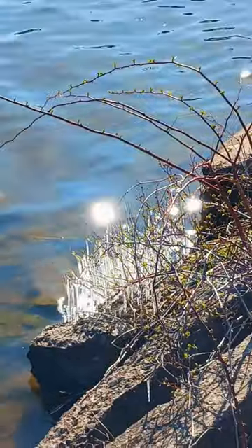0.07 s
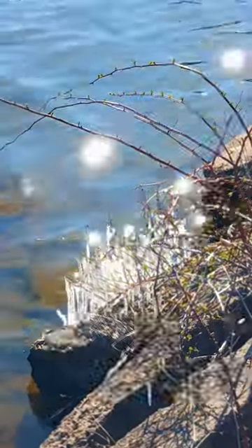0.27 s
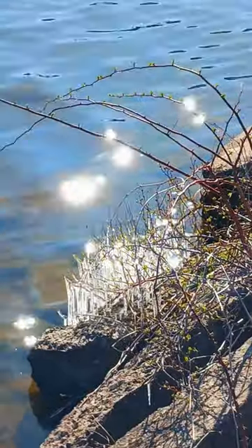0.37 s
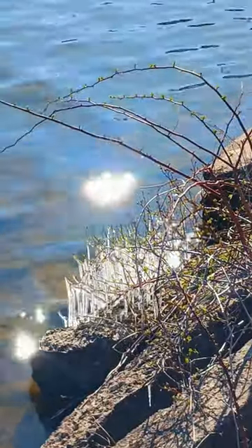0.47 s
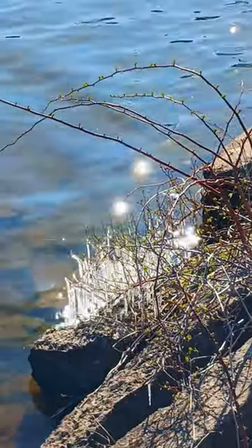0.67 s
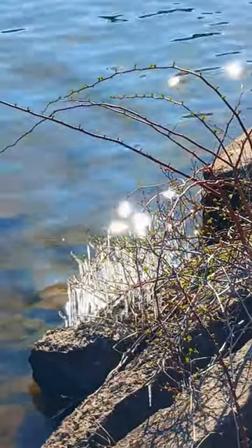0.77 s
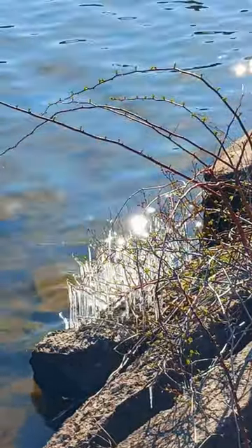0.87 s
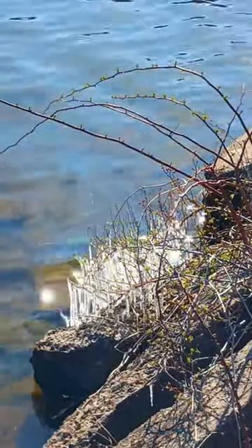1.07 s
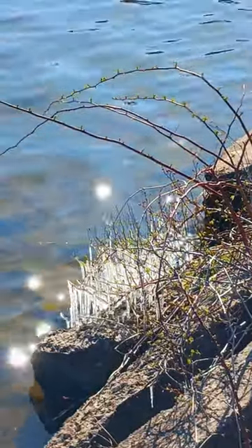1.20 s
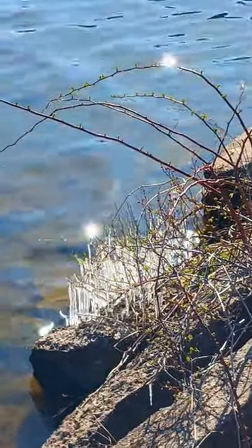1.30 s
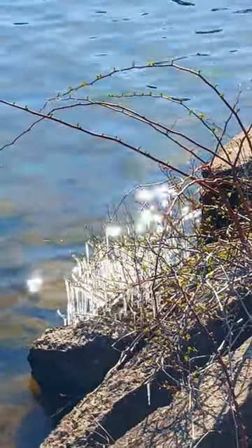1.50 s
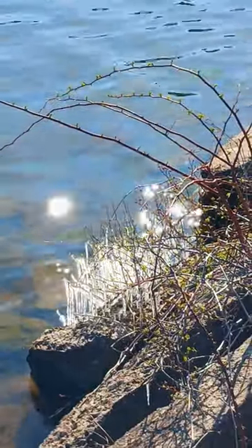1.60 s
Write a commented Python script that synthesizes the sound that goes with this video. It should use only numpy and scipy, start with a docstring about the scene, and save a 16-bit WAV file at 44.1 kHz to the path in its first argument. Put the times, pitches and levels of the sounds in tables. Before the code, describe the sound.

Wind buffets the microphone in low thumps beside a lakeshore, with faint water ticks and drips

```python
"""A rocky, icy lakeshore in wind, heard at a microphone with a left and a right port.
A gust buffets mostly the right port, with low thumps and ragged rasps, then sinks to light puffs: shaped noise.
Ripples lap the rocks: fizz built from tiny ringing pops, ticks from noise snaps, drips from short tones.
Behind them lie a far wash of noise and a low drone of two tones, probably a distant engine."""
import sys
import numpy as np
from scipy import signal
from scipy.fft import rfft, irfft
from scipy.io import wavfile
from scipy.ndimage import uniform_filter1d

SR = 44100
rng = np.random.default_rng(int(sys.argv[2]) if len(sys.argv) > 2 else 0)


def inscribe(sig):
    """Save sig as 16-bit PCM at rate SR to the path in sys.argv[1].

    A 1-D sig is mono; a 2-D sig holds one channel per row.
    Samples are clipped to [-1, 1] before scaling.
    """
    pcm = np.round(np.clip(np.atleast_2d(sig).T, -1, 1) * 32767)
    wavfile.write(sys.argv[1], SR, pcm.astype(np.int16))


N = 72765  # samples in the scene
T = np.arange(N) / SR
HZ = np.fft.rfftfreq(N, 1 / SR)


def amp(db):
    """Decibels to gain."""
    return 10 ** (np.asarray(db) / 20)


def evened(x):
    """Scales to unit rms."""
    return x / np.sqrt(np.mean(x ** 2) + 1e-30)


def curve(points):
    """Joins (time [s], value) points over the whole scene."""
    return np.interp(T, *np.transpose(points))


def read(points, hz):
    """Joins (frequency [Hz], value) points on a log axis."""
    f, value = np.transpose(points)
    return np.interp(np.log(hz + 1), np.log(f), value)


def noise(spectrum):
    """Unit noise with the given spectrum."""
    white = rfft(rng.standard_normal(N))
    return evened(irfft(white * amp(read(spectrum, HZ)), N))


def drift(rate_hz):
    """Slow random wander of unit rms, up to about the given rate."""
    white = rfft(rng.standard_normal(N))
    slow = np.exp(-(HZ / rate_hz) ** 2) * (HZ > 0)
    return evened(irfft(white * slow, N))


def panned(x, pan_db):
    """Shares a sound between the ports, left over right in dB, keeping its power."""
    gains = amp([[pan_db / 2], [-pan_db / 2]])
    return x * gains / np.linalg.norm(gains)


def add(mix, s, sound):
    """Mixes a stereo sound in at a time."""
    start = max(round(s * SR), 0)
    part = mix[:, start:][:, :sound.shape[1]]
    part += sound[:, :part.shape[1]]


def hiss():
    """The microphone's own noise, independent at each port and stronger on the left."""
    # hiss colour at each port: (frequency [Hz], relative level [dB])
    left_colour = [(500, -6), (3000, -16), (6000, -9), (10000, -7), (13000, 0.5), (16000, -1.5)]
    right_colour = [(500, 13.5), (3000, 11), (6000, -0.5), (10000, 2.5), (13000, 7), (16000, 0)]
    left_db, right_db = -69.5, -79.5
    return np.array([amp(left_db) * noise(left_colour), amp(right_db) * noise(right_colour)])


def drone():
    """Two low tones from far away, wavering together in pitch and level."""
    # loudness of the distant engine: (time [s], level [dB])
    level = [(0, -61), (.6, -66.5), (.85, -50.5), (1.2, -50.5), (1.65, -45.5)]
    # its partials: (pitch [Hz], relative level [dB], left over right [dB])
    partials = [(178, 1, -3.5), (358, -26.5, -7)]
    waver_hz, waver_db = 1, 0.6  # rms; the pitch waver is that of the first partial
    bend_s = np.cumsum(waver_hz * drift(3.1)) / SR / partials[0][0]
    tones = np.zeros((2, N))
    for hz, db, pan_db in partials:
        tones += panned(amp(db) * np.sin(2 * np.pi * hz * (T + bend_s)), pan_db)
    # doubled, a 0 dB partial has unit mean power per port
    return 2 * tones * amp(curve(level) + waver_db * drift(4.3))


def wash():
    """Far, even rush, partly shared; it reaches the left port first and each port colours it differently."""
    # loudness of the far water: (time [s], level [dB])
    level = [(0, -55), (.15, -57.5), (.25, -55), (.63, -56), (.7, -57), (.82, -57.5), (.9, -55.5),
             (.96, -56), (1.09, -52), (1.2, -54.5), (1.32, -56), (1.41, -54.5), (1.52, -57.5),
             (1.65, -54.5)]
    # its colour at each port: (frequency [Hz], relative level [dB])
    left_colour = [(100, -11), (250, 5), (400, -7), (600, -10), (720, -6), (860, 2.5), (1150, -2),
                   (1400, -3), (1700, -7), (2100, -23), (3000, -30.5), (16000, -70)]
    right_colour = [(100, 7), (250, 1), (400, -12), (600, -10.5), (720, -7), (860, 2.5), (1100, 3.5),
                    (1400, 0), (1700, -19.5), (2100, -16), (3000, -36.5), (16000, -56.5)]
    delay_s, alike = 0.00035, 0.66  # lag and likeness of the right port
    pan_db, flicker_db = -1.5, 1.1
    near, other = rfft(rng.standard_normal((2, N)))
    delayed = near * np.exp(-2j * np.pi * HZ * delay_s)
    late = alike * delayed + np.sqrt(1 - alike ** 2) * other
    left = evened(irfft(near * amp(read(left_colour, HZ)), N))
    right = evened(irfft(late * amp(read(right_colour, HZ)), N))
    return panned(np.array([left, right]), pan_db) * amp(curve(level) + flicker_db * drift(42))


def drips():
    """Each drip is a decaying tone whose phase wanders, so that it rings a little unevenly."""
    # drips near the rocks: (time [s], level [dB], pitch [Hz], decay [s], left over right [dB])
    drops = [(0.2988, -50.5, 1810, 0.012, 3), (.311, -60.5, 3660, 0.014, -19),
             (0.899, -56, 6670, 0.002, 25), (0.929, -64.5, 5210, .009, 11), (.998, -58, 3080, 0.0041, 8),
             (1.024, -68, 3500, 0.007, 2), (1.056, -58.5, 3170, 0.0029, 3), (1.073, -64, 3010, 0.02, 11),
             (1.133, -59, 1680, 0.0058, -9), (1.416, -60.5, 8750, 0.013, 19)]
    rise_s, wander_rad = 0.00022, 1.4
    out, t = np.zeros((2, N)), np.arange(SR // 10) / SR
    for s, db, hz, decay_s, pan_db in drops:
        ring = np.sin(2 * np.pi * hz * t + wander_rad * drift(230)[:len(t)])
        envelope = (1 - np.exp(-t / rise_s)) * np.exp(-t / decay_s)
        add(out, s, panned(amp(db) * ring * envelope, pan_db))
    return out


def nooks(x):
    """Gaps between the rocks scatter a sound into a brief, diffuse tail of decaying noise."""
    tail_db, decay_s = -3.5, 0.016
    t = np.arange(SR // 10) / SR
    tail = rng.standard_normal((2, len(t))) * np.exp(-t / decay_s)
    tail /= np.linalg.norm(tail[0])
    return x + amp(tail_db) * signal.oaconvolve(x, tail, axes=1)[:, :N]


def ticks():
    """Water ticks on ice and stone: very short bright noise snaps with a faint spray around them."""
    # sharp ticks: (time [s], level [dB], brightest frequency [Hz], decay [s], left over right [dB])
    snaps = [(0.3002, -53, 4170, .0002, 13), (0.3172, -36.5, 7750, 0.00047, 30),
             (.878, -58, 6000, .0003, 21), (1.3864, -54, 10100, 0.00018, 14),
             (1.3919, -48.5, 12500, 0.00041, 17), (1.4659, -43, 10900, 0.00021, 26)]
    width_octaves, spray_db, spray_decay_s = 0.35, -25, 0.0035
    out, t = np.zeros((2, N)), np.arange(2048) / SR
    octave = np.log2(np.fft.rfftfreq(len(t), 1 / SR) + 1)
    for s, db, hz, decay_s, pan_db in snaps:
        shape = np.exp(-t / decay_s) + amp(spray_db) * np.exp(-t / spray_decay_s)
        colour = 1 / (1 + ((octave - np.log2(hz)) / width_octaves) ** 2)
        signs = rng.choice([-1, 1], len(t))
        # the onset is moved to the middle, as the colouring also spreads backwards
        snap = np.fft.fftshift(irfft(rfft(shape * signs) * colour))
        snap *= np.linalg.norm(shape) / np.linalg.norm(snap)
        add(out, s - len(t) / 2 / SR, panned(amp(db) * snap, pan_db))
    return out


def fizz(count=28):
    """Each ripple swells into a dense rustle of tiny ringing bubbles, around a size of its own, and thins out."""
    # ripples at the rocks: (time [s], level [dB], fade [s], centre of its colour [Hz], left over right [dB])
    laps = [(0.166, -72.5, 0.061, 5530, 15), (.306, -64.5, 0.024, 3950, 12), (.342, -68, 0.034, 4300, 6),
            (.434, -70.5, 0.022, 3770, 1), (.8, -73, 0.046, 7200, 12), (0.876, -67.5, .06, 5440, 6),
            (.932, -74.5, 0.059, 4940, 10), (1.008, -70, 0.048, 4360, 9), (1.06, -69.5, 0.042, 6700, 16),
            (1.39, -65.5, 0.027, 5660, 13), (1.485, -74.5, 0.074, 4470, 4), (1.6, -68.5, 0.045, 4500, 7.5)]
    # colour common to all ripples: (frequency [Hz], relative level [dB])
    common_colour = [(1500, 5), (4000, -0.5), (5500, -5.5), (8000, 4), (12000, 2)]
    rise_s, width_octaves = 0.006, 0.71
    pops_per_s, spread_db, decay_cycles = 6000, 4, 10  # pops per port, over all pitches
    out, t = np.zeros((2, N)), np.arange(SR // 50) / SR
    pitches = np.geomspace(1600, 14000, count)
    swells, colours = [], []
    for s, db, fade_s, centre_hz, pan_db in laps:
        envelope = np.exp(-np.maximum((s - T) / rise_s, (T - s) / fade_s))
        swells.append(panned(amp(db) * envelope, pan_db) ** 2)  # power
        bump = 1 / (1 + (np.log2(pitches / centre_hz) / width_octaves) ** 2)
        colours.append(evened(amp(read(common_colour, pitches)) * bump))
    for hz, shares in zip(pitches, np.transpose(colours)):
        ring = np.sin(2 * np.pi * hz * t) * np.exp(-hz * t / decay_cycles)
        struck = rng.random((2, N)) < pops_per_s / count / SR
        pops = struck * amp(spread_db * np.minimum(rng.exponential(1, (2, N)), 4))
        rustle = evened(signal.oaconvolve(pops, ring[None], axes=1)[:, :N])
        power = np.tensordot(shares ** 2, np.array(swells), 1) / count
        out += np.sqrt(power) * rustle
    return out


def tears():
    """At the crest of a gust the air breaks into a short, ragged rasp: noise that swells and flickers."""
    # gust crests at the microphone: (time [s], level [dB], half length [s])
    crests = [(0.275, -55.5, 0.017), (0.328, -48, 0.0073), (.528, -60, 0.0074), (0.594, -54.5, 0.013)]
    # colour of the rasp: (frequency [Hz], relative level [dB])
    colour = [(150, -15), (380, 0), (600, -6), (900, -12), (2000, -32), (5000, -50), (16000, -70)]
    rough_db, pan_db = 3.5, -7
    level = sum(amp(db) * np.exp(-((T - s) / half_s) ** 2) for s, db, half_s in crests)
    rasp = [evened(noise(colour) * amp(rough_db * drift(200))) for port in range(2)]
    return panned(np.array(rasp) * level, pan_db)


def eddies():
    """An eddy passing a port sucks, then pushes: one low thump."""
    # eddies at the ports: (time [s], peak level [dB], pitch [Hz], left over right [dB])
    thumps = [(.273, -18, 121, -40), (0.293, -13.5, 130, -37), (0.318, -18, 78, -21), (0.35, -24, 148, -25),
              (0.418, -27, 176, -22), (0.523, -21.5, 255, -33.5), (.532, -15.5, 108.6, -27),
              (.55, -17, 111, -30), (.569, -18.5, 150, -27), (.597, -18.5, 214, -33),
              (0.6128, -10, 79, -30), (.647, -21.5, 54.4, 0), (1.04, -22.5, 78, 3),
              (1.212, -23.5, 107.4, -36), (1.4, -23.5, 133, -22), (1.547, -26, 98, 28)]
    width_cycles = 0.31
    out, t = np.zeros((2, N)), np.arange(-SR // 20, SR // 20) / SR
    for s, db, hz, pan_db in thumps:
        swing = np.sin(2 * np.pi * hz * t) / np.cosh(hz * t / width_cycles)
        add(out, s + t[0], panned(amp(db) * swing / abs(swing).max(), pan_db))
    return out


def churn(spectrum):
    """Turbulent pressure: noise with its random swells largely smoothed."""
    steadiness = 0.98  # 1 divides the short-term level out fully
    x = noise(spectrum)
    power = uniform_filter1d(abs(signal.hilbert(x)) ** 2, size=1100)  # over 25 ms
    return evened(x / power ** (steadiness / 2))


def wind():
    """Each port rumbles on its own; gusts add a higher flutter and a deep buffeting on the windward right."""
    # rumble at each port: (time [s], level [dB])
    left_level = [(0, -37), (.08, -46.5), (.18, -45.5), (.25, -38), (.33, -34.5), (.42, -41.5),
                  (.53, -37.5), (.6, -43), (.65, -33), (.76, -44), (.88, -34), (.95, -42), (1.0, -33),
                  (1.1, -39.5), (1.2, -39.5), (1.3, -42), (1.65, -42)]
    right_level = [(0, -48.5), (0.149, -40), (0.256, -32.5), (.28, -22.5), (.33, -26), (.385, -38.5),
                   (.43, -27), (.5, -31.5), (.535, -30), (.58, -28), (.615, -28), (0.659, -30),
                   (0.761, -42), (.95, -41), (1.061, -31), (1.12, -39.5), (1.23, -34.5), (1.3, -40)]
    # flutter that gusts add at the right port: (time [s], level [dB])
    flutter_level = [(0, -53), (.2, -51.5), (.24, -36.5), (.258, -47.5), (.275, -31.5), (.315, -31),
                     (.333, -42.5), (.35, -31), (.385, -54), (.42, -38.5), (.44, -45), (.475, -28),
                     (.505, -50), (.526, -29.5), (.567, -35), (.583, -54), (.607, -26.5), (.622, -33.5),
                     (.645, -31.5), (.67, -47), (.76, -53), (1.17, -67), (1.225, -39), (1.3, -55.5)]
    # colours of rumble, flutter and deep buffeting: (frequency [Hz], relative level [dB])
    rumble_colour = [(15, -21.5), (25, -12), (36, -8), (50, 0.5), (72, 2), (100, -5.5), (140, -15.5),
                     (200, -16.5), (280, -31), (400, -53.5), (2000, -70)]
    flutter_colour = [(50, -30), (90, -12.5), (135, 7.5), (200, -2.5), (290, -11), (400, -20), (570, -30.5),
                      (900, -44), (2000, -61), (6000, -84.5), (16000, -105)]
    buffet_colour = [(30, -12), (44, 14), (56, 13.5), (75, -15.5), (200, -69.5)]
    buffet_db = 6  # over the smoothed flutter level
    left = amp(curve(left_level)) * churn(rumble_colour)
    right = amp(curve(right_level)) * churn(rumble_colour)
    gust = amp(curve(flutter_level))
    flutter = gust * churn(flutter_colour)
    slow_gust = uniform_filter1d(gust, size=3000)  # over 68 ms
    buffet = amp(buffet_db) * slow_gust * churn(buffet_colour)
    return np.array([left, right + flutter + buffet])


def scene():
    """Wind on the ports over the water and the distance; only the drips ring in the nooks."""
    distance = drone() + wash()
    water = nooks(drips()) + ticks() + fizz()
    return distance + water + tears() + eddies() + wind()


def record(dry):
    """The microphone cuts the deepest rumble and adds hiss; then come the band limit and soft ends."""
    low_cut_hz, edge_hz, fade_s = 30.7, 16050, 0.004
    low_cut = 1 / np.sqrt(1 + (low_cut_hz / (HZ + 1e-3)) ** 10)
    heard = irfft(rfft(dry) * low_cut, N)
    lowpass = signal.firwin(511, edge_hz, window=("kaiser", 9), fs=SR)
    ends = np.sin(np.pi / 2 * np.minimum(np.minimum(T, T[::-1]) / fade_s, 1)) ** 2
    return ends * signal.oaconvolve(heard + hiss(), lowpass[None], "same", axes=1)


dry = scene()
out = record(dry)
inscribe(out)
```